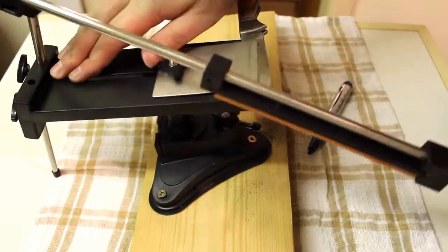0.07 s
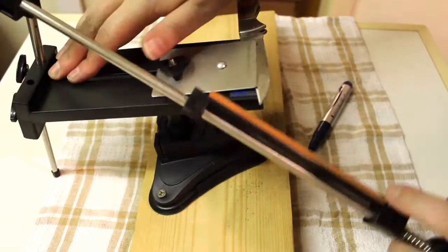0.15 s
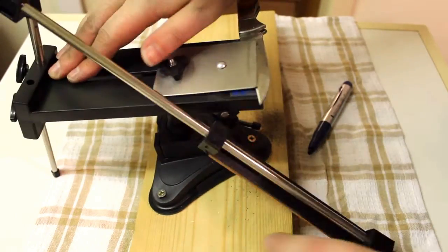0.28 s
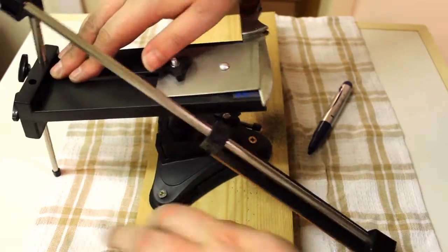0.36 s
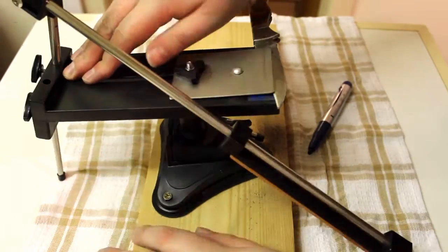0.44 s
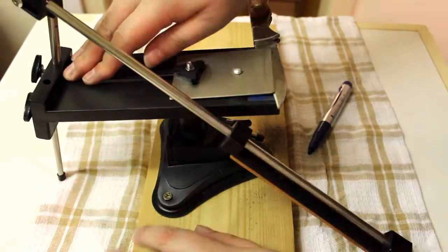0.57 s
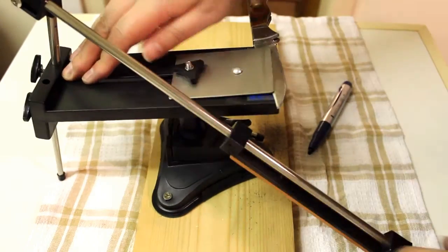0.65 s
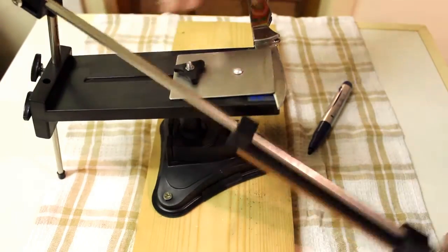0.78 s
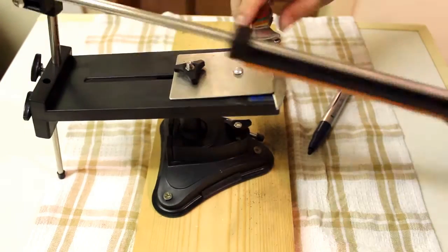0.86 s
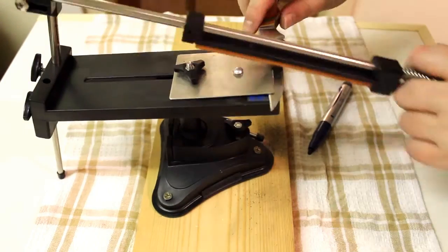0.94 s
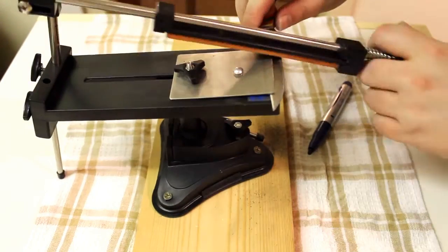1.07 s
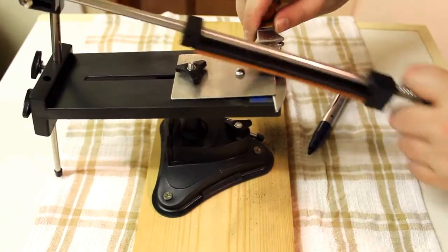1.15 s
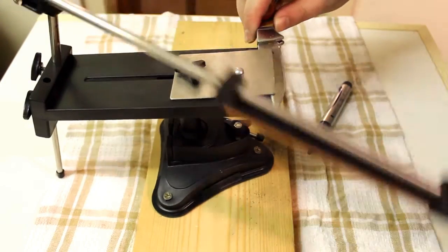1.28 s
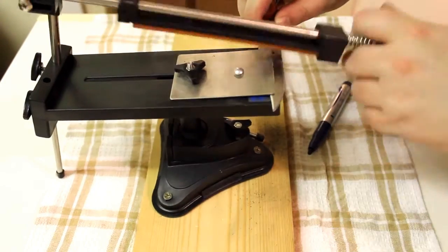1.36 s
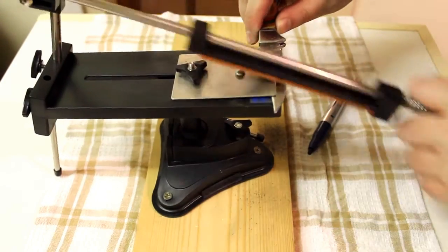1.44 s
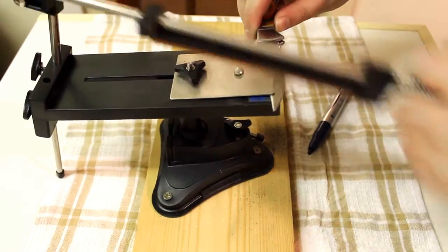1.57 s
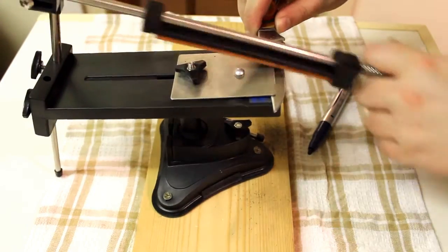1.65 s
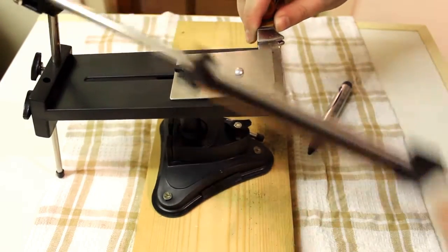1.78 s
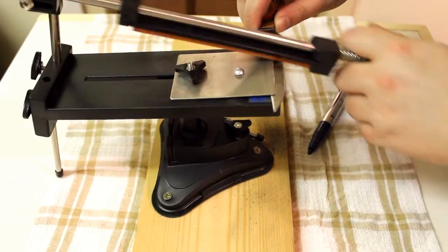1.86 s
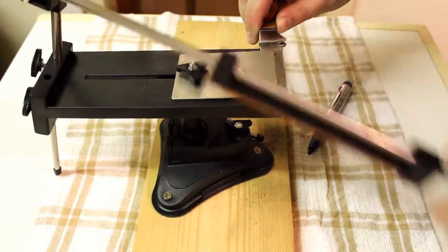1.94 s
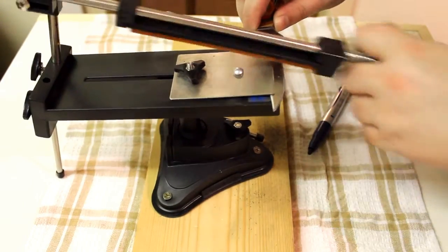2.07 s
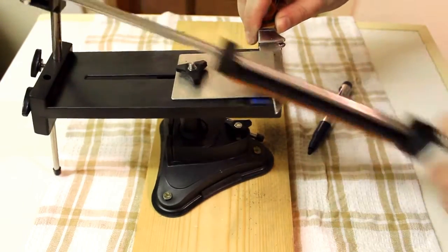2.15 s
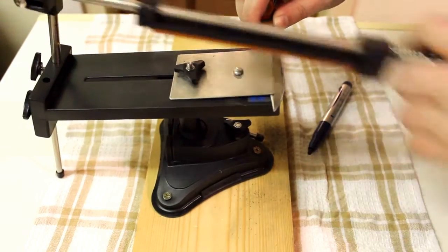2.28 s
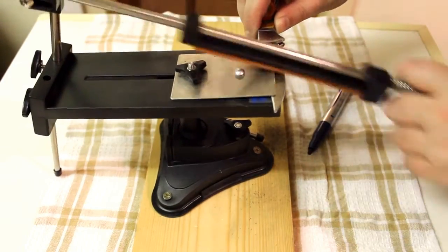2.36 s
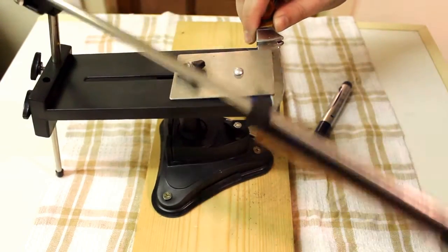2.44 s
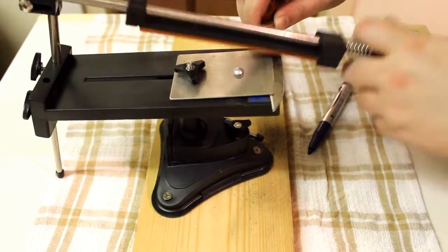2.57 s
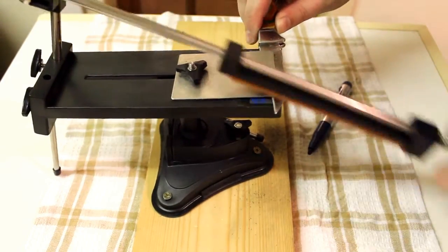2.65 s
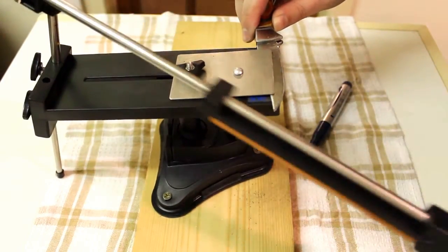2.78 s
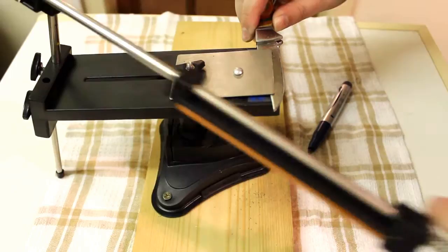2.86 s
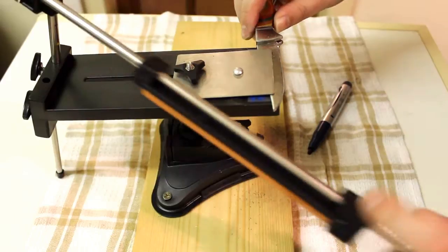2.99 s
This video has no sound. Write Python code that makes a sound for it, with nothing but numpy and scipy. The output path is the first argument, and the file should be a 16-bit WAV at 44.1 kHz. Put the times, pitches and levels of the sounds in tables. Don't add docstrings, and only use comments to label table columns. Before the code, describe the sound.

A sharpening stone works a knife, sped up, close and dry indoors, over faint pulsing hum, hiss and tiny ticks. Light rod taps from 0.1 s lead to a loud metallic clack at 0.28 s, then a bright click at 0.47. From 0.85 s rapid gritty scrapes, about nine a second, ring and groan, with crisp end knocks from 1.34. At 2.75 s everything drops to a slow, low, fading scrape and deep hum.

```python
import sys
import numpy as np
from scipy import signal
from scipy.fft import rfft, irfft
from scipy.io import wavfile
from scipy.ndimage import uniform_filter1d

SR = 44100
rng = np.random.default_rng(int(sys.argv[2]) if len(sys.argv) > 2 else 0)


def to_wav(s):
    ch = np.atleast_2d(s).T
    pcm = np.round(np.clip(ch, -1, 1) * 32767)
    wavfile.write(sys.argv[1], SR, pcm.astype(np.int16))


def magnitude_from_level(level_db):
    exponent = np.asarray(level_db, float) / 20
    return 10 ** exponent


N = 134505
T = np.arange(N) / SR
FADE_S, CUT_S = 2.751, 2.797

# (frequency [Hz], bandwidth [Hz], level [dB])
BODY = [(247, 46, -5.5), (516.8, 18, -2.5), (722, 106, -2.5), (930, 110, -1), (1048, 32, -11.5),
        (1290, 54, -8)]
# (frequency [Hz], bandwidth [Hz], level [dB])
STEEL = [(3477, 240, -1.5), (3930, 320, 1), (2994, 250, -4.5), (4730, 1400, -5), (5880, 160, -8)]


def evened(x):
    return x / np.sqrt(np.mean(x ** 2) + 1e-20)


def colour(x, points):
    f, db = np.transpose(points)
    hz = np.fft.rfftfreq(len(x), 1 / SR)
    gain = magnitude_from_level(np.interp(np.log(hz + 1), np.log(f), db))
    return evened(irfft(rfft(x) * gain, len(x)))


def ring(x, peaks):
    out = 0
    for hz, width, db in peaks:
        r = np.exp(-np.pi * width / SR)
        poles = [1, -2 * r * np.cos(2 * np.pi * hz / SR), r * r]
        out = out + magnitude_from_level(db) * (1 - r) ** .5 * signal.lfilter([1, 0, -1], poles, x) * .5
    return out


def glide(x, hz, width):
    turn = np.exp(2j * np.pi * np.cumsum(hz) / SR)
    r = np.exp(-np.pi * width / SR)
    return evened((turn * signal.lfilter([1 - r], [1, -r], x / turn)).real)


def struck(modes, t):
    return sum(magnitude_from_level(db - 60 * t / t60) * np.sin(2 * np.pi * hz * t) for hz, db, t60 in modes)


def above(x, hz):
    return signal.sosfilt(signal.butter(2, hz, "high", fs=SR, output="sos"), x)


def wander(hz):
    lowpass = 1 + (np.fft.rfftfreq(N, 1 / SR) / hz) ** 4
    return evened(irfft(rfft(rng.standard_normal(N)) / lowpass, N))


def grains(per_s, spread_db):
    strength = magnitude_from_level(spread_db * np.minimum(rng.exponential(1, N), 5))
    return rng.standard_normal(N) * strength * (rng.random(N) < per_s / SR)


def patchy(x):
    z = signal.stft(x, nperseg=256)[2]
    patches = uniform_filter1d(rng.standard_normal(z.shape), size=7, axis=0)
    patches = uniform_filter1d(patches, size=9, axis=1)
    return evened(signal.istft(z * magnitude_from_level(2.8 * evened(patches)), nperseg=256)[1][:N])


def hum(speed):
    # (frequency [Hz], level [dB rms])
    partials = [(188.4, -64.5), (400, -68.5), (650, -76), (1201, -64.5)]
    main_hz, beat_hz, beat_s = 588.7, 23.7, .681
    lines = partials + [(main_hz, -43), (main_hz - beat_hz, -62), (main_hz + beat_hz, -54.5)]
    out = 0
    for hz, db in lines:
        level = np.sqrt(2) * magnitude_from_level(db + 1.1 * wander(3.0))
        out = out + level * np.cos(2 * np.pi * hz * speed * (T - beat_s))
    return out


def room():
    # (frequency [Hz], density [dB per Hz])
    hiss_spectrum = [(25, -24.5), (150, -18.5), (310, -18), (530, -4.5), (700, -8), (1100, -14),
                     (2200, -18.5), (16000, -31)]
    # (time [s], level [dB])
    snaps = [(0.0308, -38), (0.0434, -47), (0.0727, -38), (0.2514, -31), (0.3764, -39), (0.4174, -37),
             (0.5434, -46), (0.5726, -39), (0.5831, -37), (0.6145, -38), (0.6264, -48), (0.6559, -38),
             (0.6978, -39), (0.9163, -36), (1.0004, -38), (1.0415, -32), (1.1264, -36), (1.5424, -30),
             (1.6666, -29), (1.7814, -28), (1.8704, -35), (2.1251, -33), (2.1984, -28), (2.5731, -26),
             (2.5844, -31), (2.6254, -30), (2.7094, -29)]
    per_s, first_s = 24, .0017
    at_splice = np.diff(np.floor((T - first_s) * per_s), append=0) == 1
    ticks = at_splice * magnitude_from_level(-41 + 2.3 * T + 3.7 * wander(22))
    for s, db in snaps:
        ticks[round((s + .001) * SR)] += magnitude_from_level(db + 11)
    ticks = signal.sosfilt(signal.butter(2, (1200, 9500), "band", fs=SR, output="sos"), ticks)
    hiss = magnitude_from_level(-50 + 1.0 * wander(42)) * colour(rng.standard_normal(N), hiss_spectrum)
    return hiss + ticks


def knocks():
    # (time [s], edge [dB], steel [dB], base [dB])
    handling = [(0.116, -29.5, -38, -37), (0.1706, -30, -35.5, -29.5), (0.177, -27.5, -34, -31),
                (0.2159, -23, -26, -28), (0.2245, -15, -27, -53), (0.2845, -7.5, -24, -25),
                (0.3223, -24, -21, -34), (0.345, -32, -24.5, -39), (0.4699, -3.5, -19, -24),
                (0.4728, -11, -25, -25), (0.8403, -32, -52, -48), (0.847, -53, -35.5, -42),
                (0.8677, -30.5, -36, -40), (1.07, -35, -33.5, -38), (1.0825, -21, -35, -43),
                (1.0893, -21, -42, -42), (1.1768, -15.5, -36, -39), (1.1851, -25, -34, -33.5)]
    # (time [s], edge [dB], steel [dB], base [dB])
    catches = [
        (1.391, -50, -39, -55),
        (1.640, -41, -37, -52),
        (2.0253, -50, -34, -39),
        (2.0701, -45, -37, -55),
        (2.099, -45, -40, -55),
        (2.2296, -50, -34, -45),
        (2.258, -45, -35, -38),
        (2.481, -50, -34, -50),
    ]
    # (time [s], edge [dB], steel [dB], base [dB])
    stroke_ends = [(1.3353, -29, -27, -36), (1.3378, -9.5, -23, -32), (1.4698, -12, -24.5, -28.5),
                   (1.4743, -8.5, -28, -22.5), (1.5873, -8, -29, -58), (1.7071, -8, -23, -23),
                   (1.7115, -12.5, -26, -32), (1.8252, -22, -28, -28.5), (1.8285, -13.5, -26.5, -45),
                   (1.9323, -17, -26, -30), (1.9386, -11.5, -30.5, -36), (2.049, -13.5, -23.5, -28),
                   (2.1544, -17, -23, -31), (2.1642, -22, -34, -37), (2.1773, -25, -28.5, -46),
                   (2.249, -20.5, -28, -31), (2.2798, -11.5, -33, -57), (2.4122, -14, -26.5, -25),
                   (2.4171, -9.5, -27.5, -26), (2.5282, -22, -32, -52), (2.532, -9, -29, -31.5),
                   (2.536, -29, -29, -38), (2.6584, -19, -24.5, -25.5), (2.6627, -8, -28, -28),
                   (2.785, -5, -25, -28.5)]
    # (frequency [Hz], bandwidth [Hz], level [dB])
    edge_modes = [(7800, 920, -13), (9060, 1340, -6.5), (10870, 800, -7), (11950, 1440, -2.5),
                  (14100, 1900, -7), (16100, 2700, -7.5)]
    # (frequency [Hz], bandwidth [Hz], level [dB])
    thin_modes = [(8060, 86, -17), (10760, 100, -12.5), (13900, 180, -13)]
    size = 4410
    t = np.arange(size) / SR
    crack = (1 - np.exp(-t / .0004)) * np.exp(-t / .0006)
    tail = magnitude_from_level(-25) * np.exp(-t / .02)
    shape = magnitude_from_level([[0], [-8.0], [-6.0]]) * crack + tail
    blow = magnitude_from_level([[-30.0], [3.0], [3.0]]) * (np.arange(size) == 10)
    drive = np.zeros((3, N + size))
    for s, *db in handling + catches + stroke_ends:
        force = rng.standard_normal(size) * shape + blow
        drive[:, round(s * SR):][:, :size] += magnitude_from_level(np.array(db))[:, None] * force
    edge, steel, base = drive[:, :N]
    edge = above(above(ring(edge, edge_modes + thin_modes), 7540), 7540)
    steel = signal.sosfilt(signal.butter(2, 5600, fs=SR, output="sos"), ring(steel, STEEL))
    base = above(ring(base, BODY), 250)
    return magnitude_from_level(5.0) * edge + magnitude_from_level(11.5) * above(steel, 2480) + magnitude_from_level(12.5) * base


def rod():
    # (frequency [Hz], level [dB], t60 [s])
    rod_modes = [(915, -3, .07), (1308, 1, .055), (1787, -5, .06), (2778, -12, .04), (3270, -4, .03),
                 (3520, 0, .035), (3680, -4, .06), (3840, -7, .06), (5040, -12, .04)]
    # (time [s], level [dB], upper modes [dB])
    taps = [
        (.1706, -45, -3),
        (.2122, -44, 5),
        (.2158, -29.5, 0),
        (.2185, -32, -4),
        (.2245, -37, -2),
        (.2625, -33, -3),
        (.268, -40, -1),
    ]
    size = 8820
    t, out = np.arange(size) / SR, np.zeros(N)
    low, high = struck(rod_modes[:3], t), struck(rod_modes[3:], t)
    for s, db, high_db in taps:
        chatter = rng.standard_normal(400) * np.exp(-t[:400] / .002)
        chatter = np.append(1, .45 * chatter / np.linalg.norm(chatter))
        tap = signal.oaconvolve(low + magnitude_from_level(high_db) * high, chatter)[:size]
        out[round(s * SR):][:size] += magnitude_from_level(db) * tap
    return above(out, 600)


def clack():
    # (frequency [Hz], level [dB], t60 [s])
    clack_modes = [(698, -18, .06), (915, -2.5, 0.2), (1100, -4, 0.033), (1170, 3, 0.037),
                   (1330, -2, 0.065), (1744, 0, 0.14), (2130, -4.5, 0.12), (2654, 3, 0.077),
                   (3350, -6, .12), (3940, 4, .09), (4080, 1, 0.07), (5160, -3, .1), (5570, 6, .041),
                   (8000, -4, .042)]
    # (time after the drop [s], level [dB])
    bounces = [
        (0, 0),
        (.0009, -3),
        (.0088, -16),
        (.0195, -11),
        (.0395, -28),
        (.0615, -31),
    ]
    # (frequency [Hz], density [dB per Hz])
    rattle_spectrum = [(250, -22), (900, 0.5), (1500, -2.5), (4000, -1), (6500, -12.5), (9000, -28.5),
                       (16000, -19)]
    drop_s = .2828
    t = np.maximum(T - drop_s, 0)
    modes = sum(magnitude_from_level(db) * struck(clack_modes, np.maximum(t - s, 0)) for s, db in bounces)
    modes = magnitude_from_level(-13) * modes / abs(modes).max()
    blow = -magnitude_from_level(-1.5) * np.sin(2 * np.pi * 1100 * t) * np.exp(-t / 0.0016) * np.minimum(t / .0006, 1)
    rattle = colour(grains(12000, 2.6), rattle_spectrum) * (T > drop_s) / (1 + (t / 0.13) ** 8)
    decay = magnitude_from_level(-13.5 - 1070 * t) + magnitude_from_level(-22.5 - 253 * t)
    return above(blow + modes + rattle * decay, 310)


def scrape():
    # (middle [s], half length [s], grit [dB], groan [dB], groan frequency [Hz])
    strokes = [(0.866, 0.031, -55, -62, 1030), (0.968, 0.05, -46, -48.5, 1044),
               (1.088, 0.047, -47.5, -57, 950), (1.193, 0.088, -49, -58.5, 970),
               (1.308, 0.09, -45.5, -46.5, 1102), (1.419, 0.05, -48, -46.5, 930),
               (1.562, 0.063, -41, -45.5, 990), (1.673, 0.066, -49.5, -48.5, 880),
               (1.792, 0.076, -45.5, -44.5, 1000), (1.878, 0.086, -47, -53, 970),
               (2.015, 0.078, -43, -43, 1048), (2.132, 0.052, -47, -47, 950),
               (2.247, 0.07, -37.5, -42, 1016), (2.354, 0.078, -47.5, -47, 930),
               (2.492, 0.071, -42, -45, 1005), (2.594, 0.067, -47, -46, 976), (2.736, 0.09, -43, -44, 1020)]
    sing_levels = [-52, -53, -46, -54, -46, -50.5, -42.5, -50, -45.5, -53, -45.5, -49.5, -40, -49.5, -42.5,
                   -49.5, -44.5]
    # (frequency [Hz], density [dB per Hz])
    grit_spectrum = [(900, -32), (1800, -6), (4200, -1), (6500, -9), (8500, -4), (10700, 0.5),
                     (16000, -1.5)]
    press, load, sing, hz = np.zeros(N), np.zeros(N), np.zeros(N), np.ones(N) * 1000
    for (s, half, grit_db, groan_db, groan_hz), sing_db in zip(strokes, sing_levels):
        u = (T - s) / half
        swell = np.exp(-2.2 * u ** 2)
        press = press + magnitude_from_level(grit_db) * swell
        load = load + magnitude_from_level(groan_db) * swell ** 1.48
        sing = sing + magnitude_from_level(sing_db) * swell ** 2.16
        hz = np.where(u > -1, groan_hz * (1 + 0.085 * np.clip(u, -1, 1)), hz)
    grit = press * patchy(colour(grains(8000, 1.1), grit_spectrum))
    steel = sing * patchy(above(ring(grains(2500, 3.1), STEEL), 2400))
    grit = grit + magnitude_from_level(-3.5 + 2.5 * wander(35)) * steel
    rub = grains(4000, 1.8)
    late = np.interp(T - .022, T, load)
    groan = load * (glide(rub, hz, 46) + magnitude_from_level(0.5) * evened(ring(rub, BODY)))
    groan = groan + late * magnitude_from_level(1) * glide(rub[::-1], 470 + 0 * T, 28.5)
    return magnitude_from_level(1.36 * wander(58)) * grit + magnitude_from_level(-3 + 1.7 * wander(20)) * groan


def slow_part():
    # (time [s], level [dB])
    hum_level = [(2.75, -35), (2.86, -49), (2.95, -33), (3.0, -46), (3.05, -45)]
    # (time [s], level [dB])
    stroke_level = [(2.752, -32), (2.81, -38.5), (2.9, -43.5), (2.985, -43.5), (3.0, -46), (3.05, -47)]
    # (frequency [Hz], density [dB per Hz])
    slow_spectrum = [(25, -16), (90, -6), (300, -6.5), (1200, -7.5), (5500, -2), (8000, -10.5), (9200, -23),
                     (16000, -43)]
    # (frequency [Hz], bandwidth [Hz], level [dB])
    slow_steel = [(1980, 90, -4), (2650, 110, 1), (2850, 110, 1), (3460, 220, 2), (4340, 260, 0),
                  (5400, 400, -2), (7140, 400, -3)]
    rub = grains(15000, 1.8)
    steel = evened(above(ring(rub, slow_steel), 2150))
    steel = magnitude_from_level(-2.0 - 59 * np.maximum(T - FADE_S, 0)) * steel
    steel = signal.sosfilt(signal.butter(8, 8600, fs=SR, output="sos"), steel)
    grit = colour(rub, slow_spectrum) + steel
    groan = evened(ring(rng.standard_normal(N), [(228, 29, -2), (298, 110, -11.0)]))
    groan = magnitude_from_level(-51 - 7.1 * (T - FADE_S)) * groan
    tone = magnitude_from_level(np.interp(T, *np.transpose(hum_level))) * evened(hum(1 / 4))
    tone = tone * np.clip((T - FADE_S) / .012, 0, 1)
    return magnitude_from_level(np.interp(T, *np.transpose(stroke_level))) * grit + groan + tone


def scene():
    fade = np.clip((T - FADE_S) / (CUT_S - FADE_S), 0, 1)
    noises = room() + knocks() + rod() + clack() + scrape()
    fast = hum(1) * (1 - fade) + noises * np.clip((CUT_S - T) / 0.0053, 0, 1)
    return (fast + slow_part() * (T > FADE_S))[None]


def band_limit(x):
    return signal.sosfilt(signal.butter(12, 16970, fs=SR, output="sos"), x)


def record(dry):
    lowpass = signal.firwin(401, 15900, window=("kaiser", 5), fs=SR)
    x = signal.oaconvolve(dry, lowpass[None], "same")
    return band_limit(np.clip(x, -1, 1))


dry = scene()
out = record(dry)
to_wav(out)
```